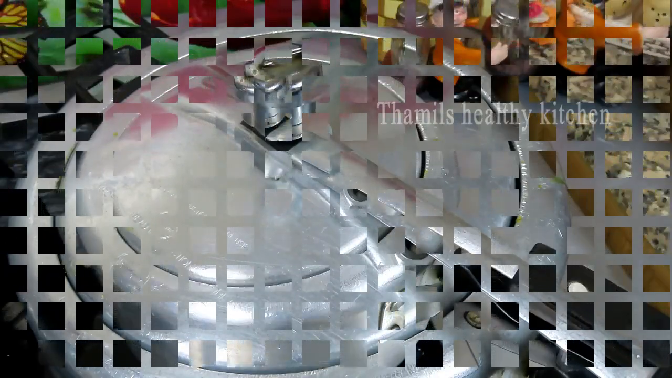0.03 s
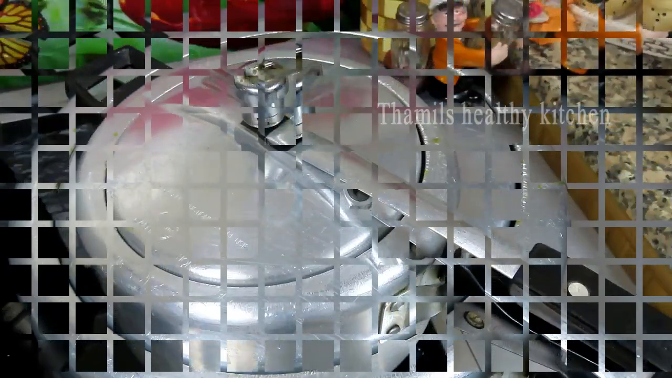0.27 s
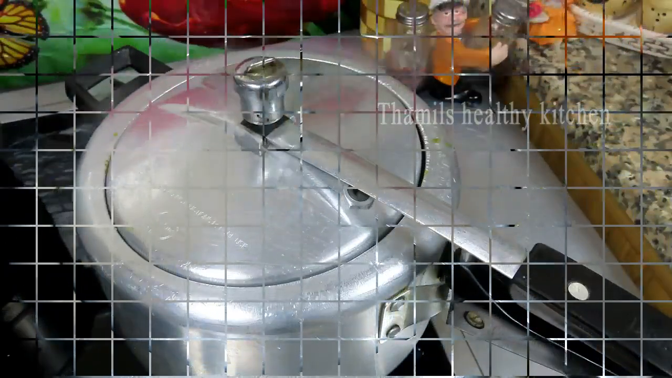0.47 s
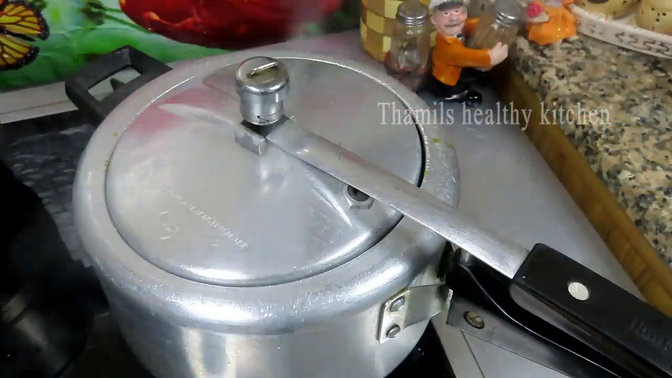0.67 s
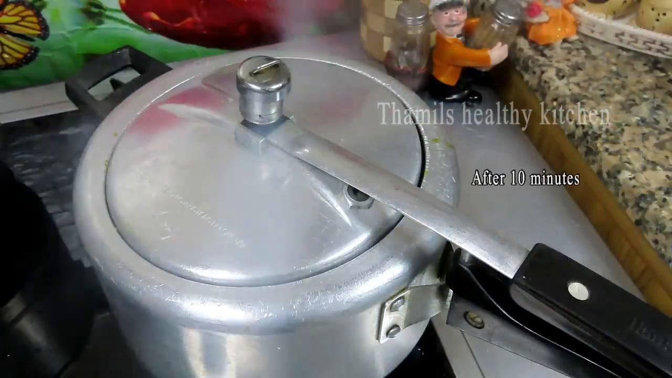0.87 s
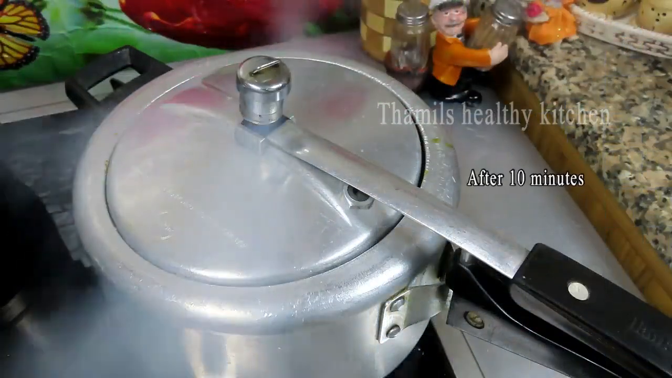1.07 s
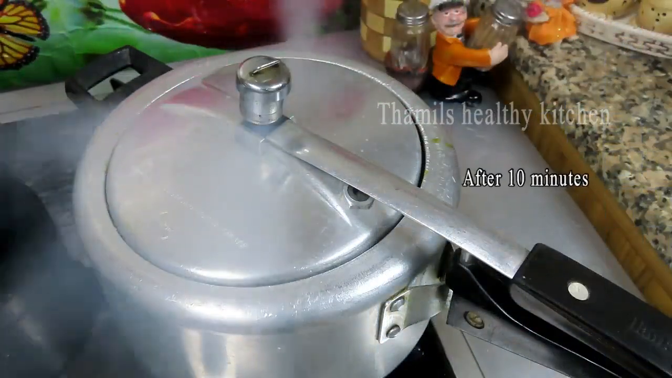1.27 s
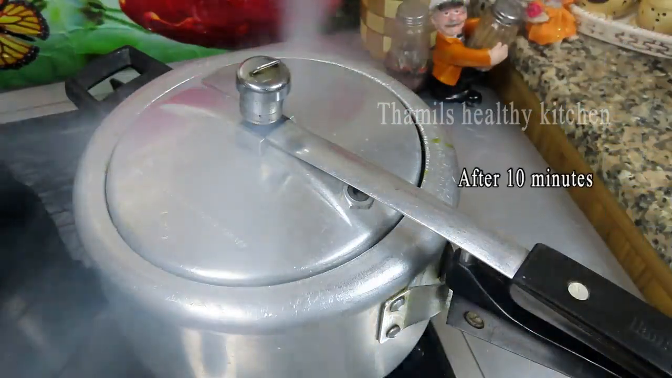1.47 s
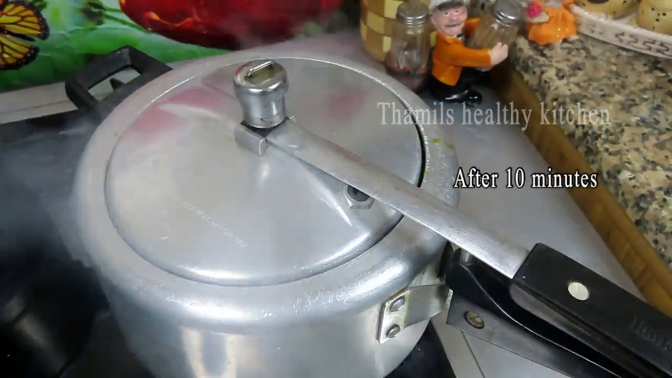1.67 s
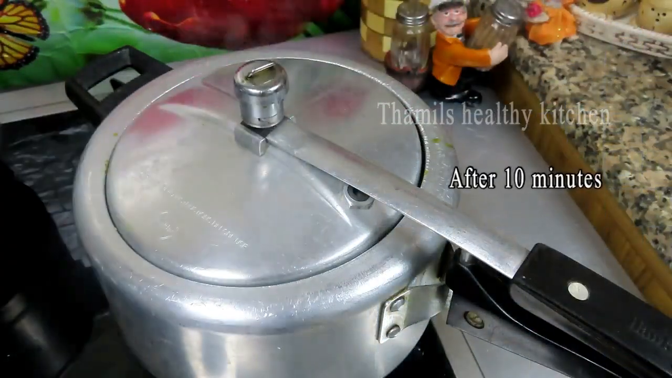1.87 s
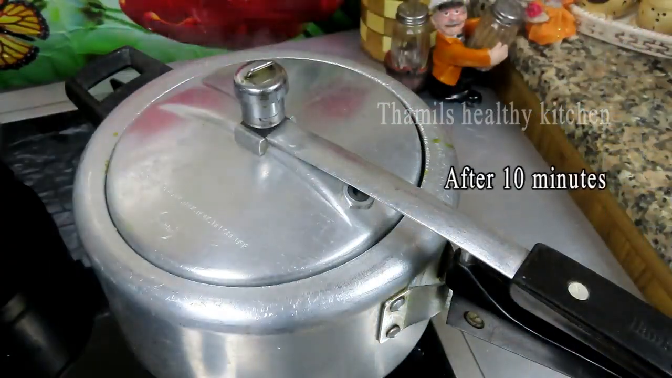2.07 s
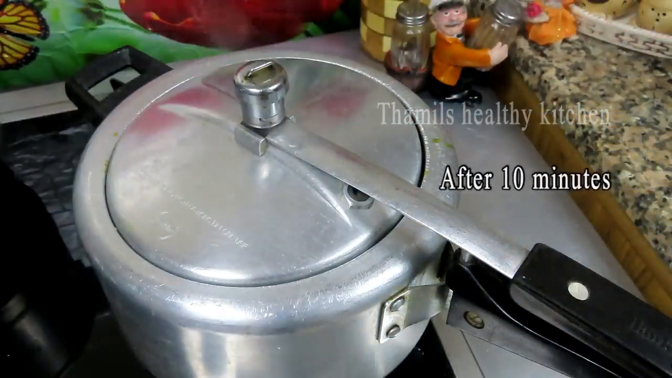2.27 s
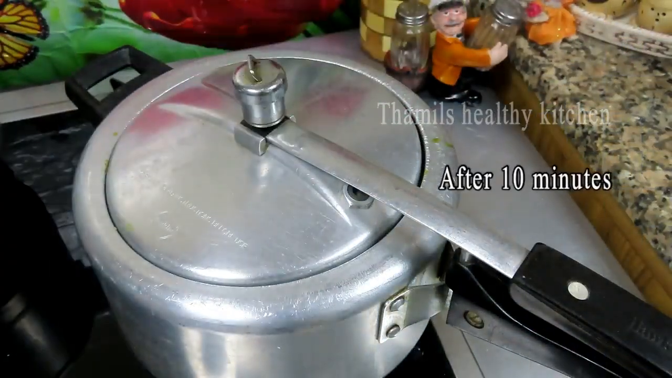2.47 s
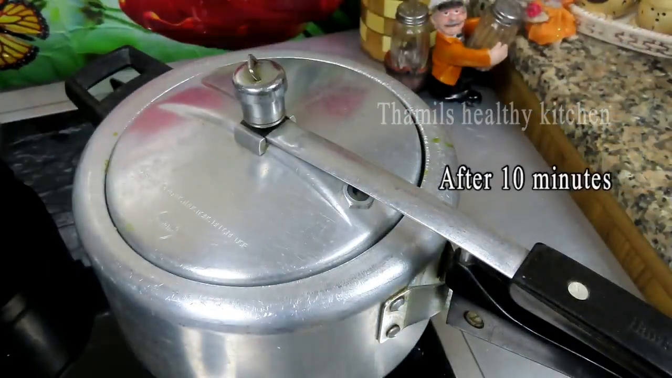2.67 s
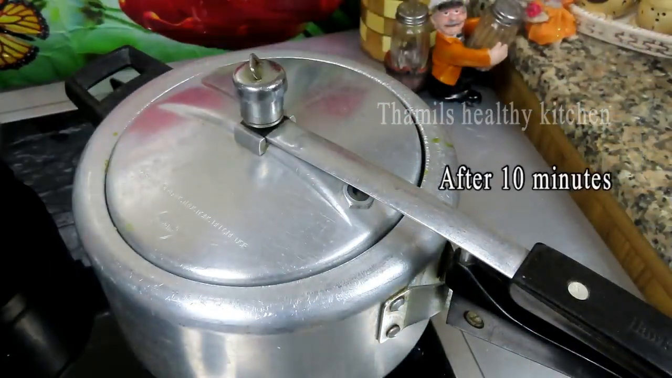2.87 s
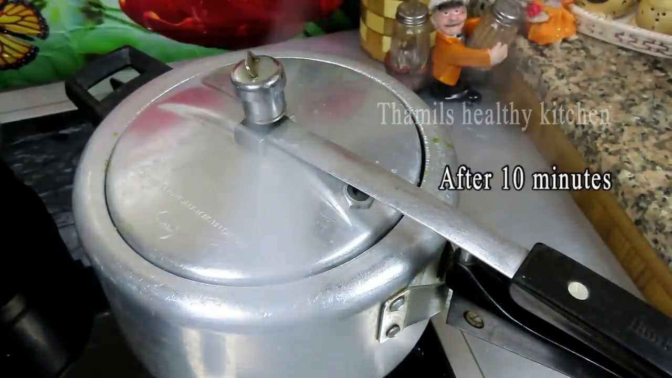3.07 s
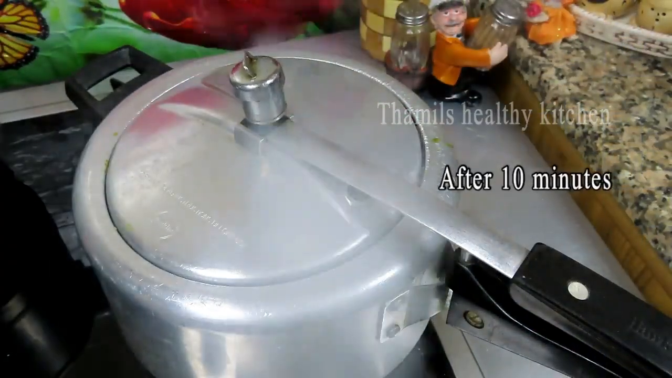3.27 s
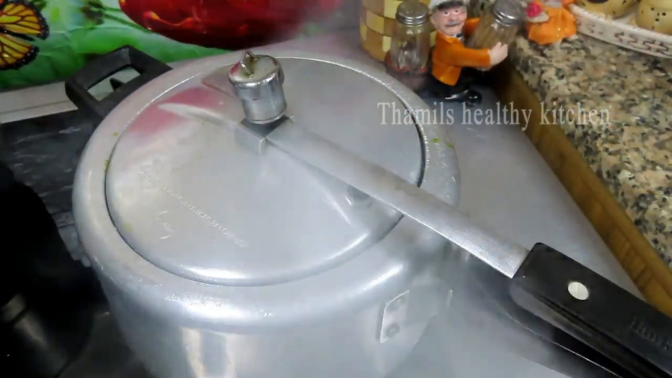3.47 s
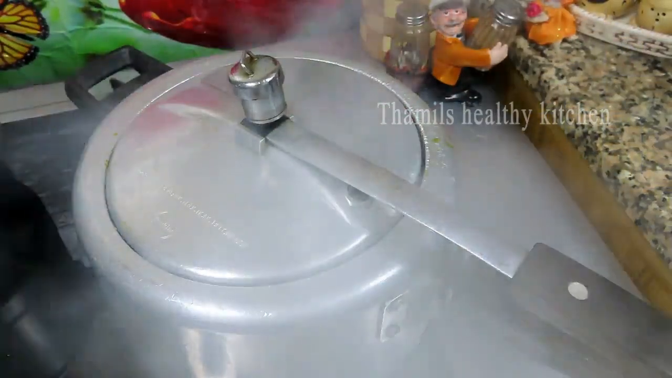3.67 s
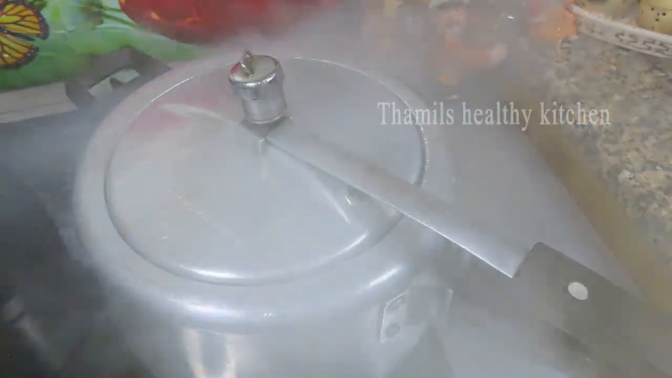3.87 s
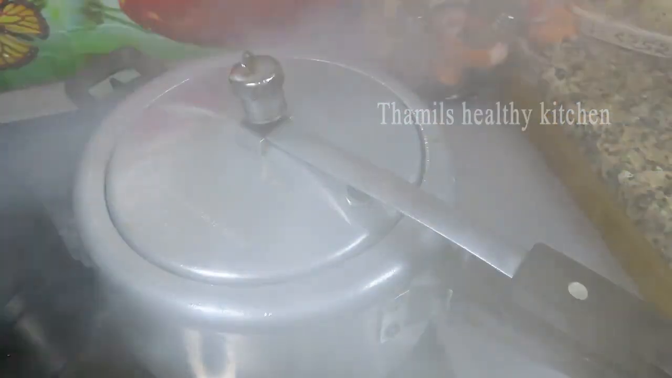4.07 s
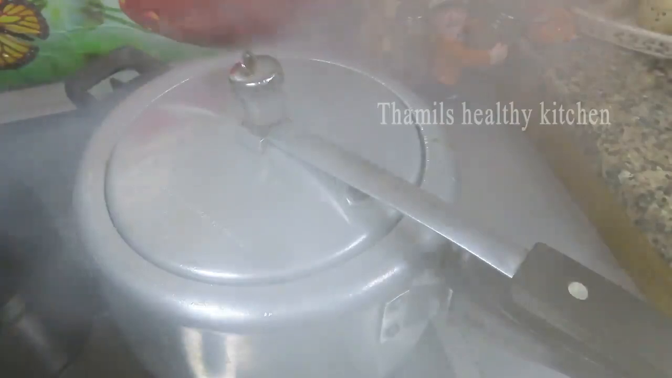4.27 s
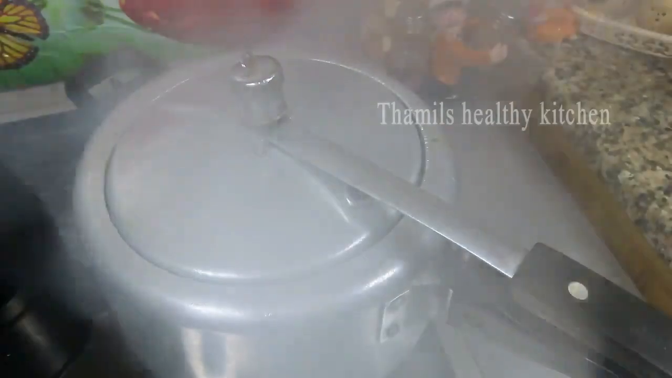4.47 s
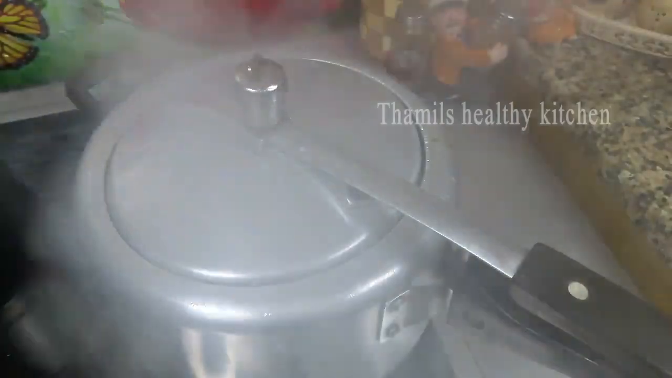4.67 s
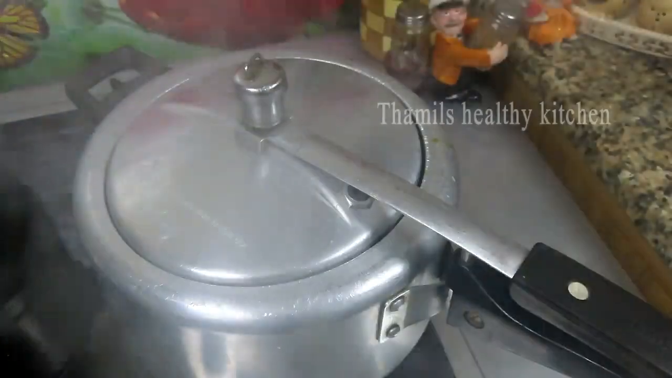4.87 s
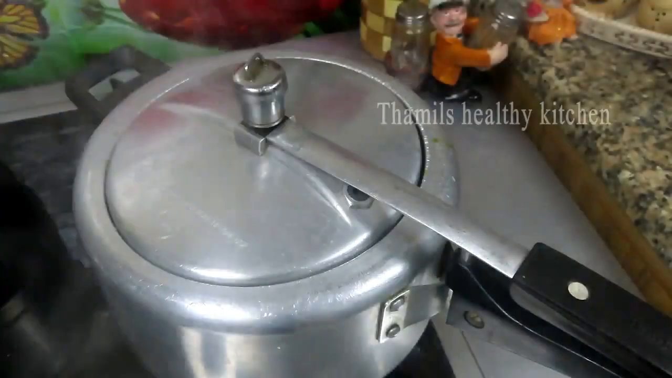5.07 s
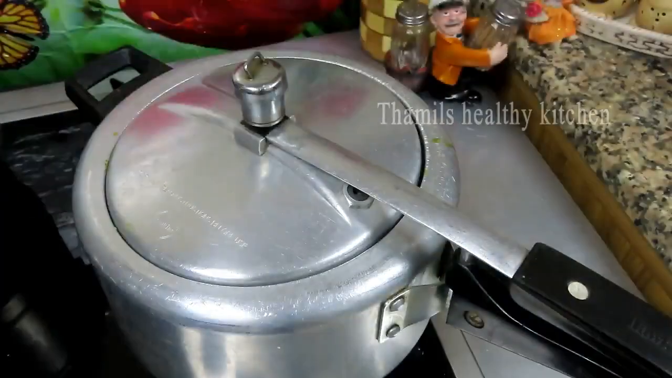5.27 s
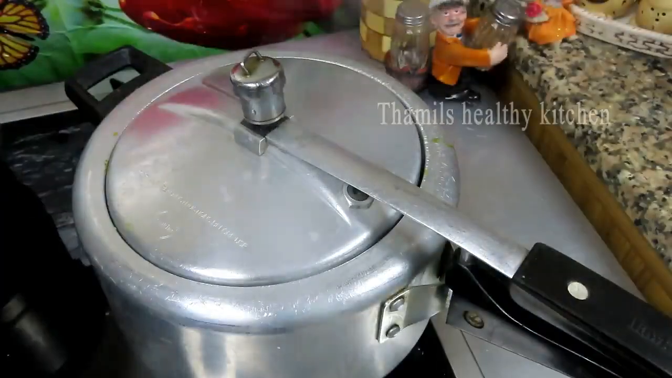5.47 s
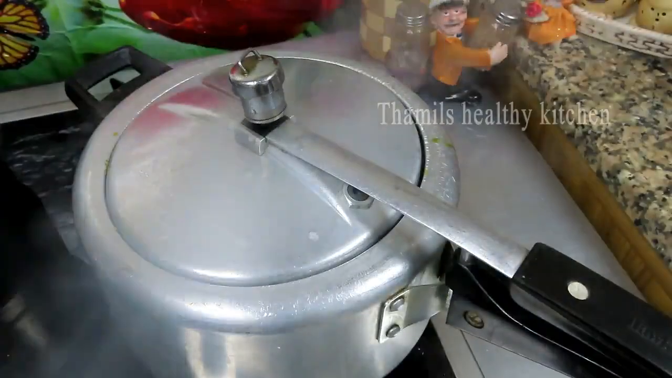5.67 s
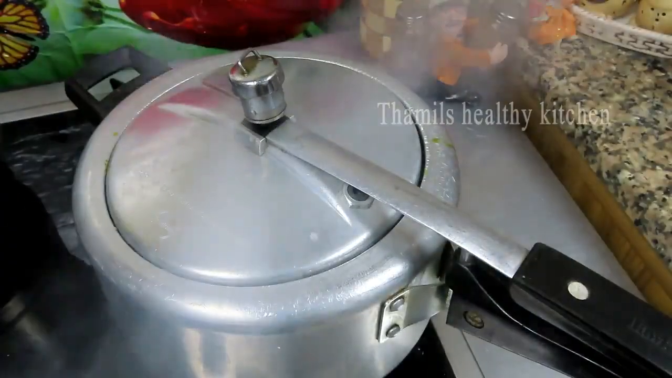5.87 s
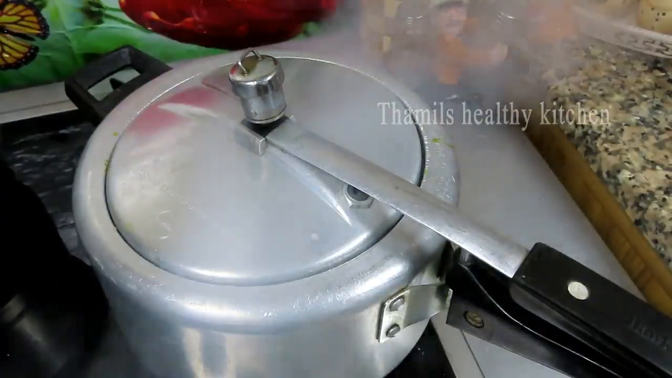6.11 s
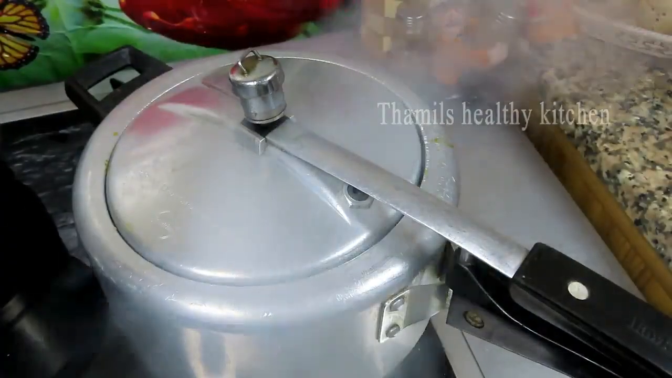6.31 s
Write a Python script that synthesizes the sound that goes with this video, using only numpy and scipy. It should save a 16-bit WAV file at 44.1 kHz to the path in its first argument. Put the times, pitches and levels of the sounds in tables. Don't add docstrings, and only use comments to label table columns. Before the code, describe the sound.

Very close stereo in a hard-walled kitchen: faint steam spits, then a pressure cooker valve pops open into a loud, roaring hiss lasting over a second. It shuts abruptly. Hollow knocks come from another room, then a longer blast buffets the microphone. After another lull, a short third burst coincides with a metal clatter and continues as a steady hiss.

```python
import sys
import numpy as np
from scipy import signal
from scipy.fft import rfft, irfft, next_fast_len
from scipy.io import wavfile
from scipy.ndimage import uniform_filter1d, map_coordinates

SR = 44100
rng = np.random.default_rng(int(sys.argv[2]) if len(sys.argv) > 2 else 0)


def invert_db(level):
    return 10 ** (np.asarray(level, dtype=float) / 20)


def materialize(psi):
    bounded = np.clip(np.atleast_2d(psi).T, -1, 1)
    quanta = np.round(bounded * 32767).astype(np.int16)
    wavfile.write(sys.argv[1], SR, quanta)


N = 279726

# start in seconds, end in seconds.
VIEWS = [
    (0, 2.41),
    (2.428, 5.162),
    (5.176, 6.34),
]
LATER_STARTS_S = [start_s for start_s, _ in VIEWS[1:]]

# lift in seconds, fully open in seconds, shut in seconds,
# hiss level in dB, sag in dB per second.
BLASTS = [
    (.425, .495, 1.665, -18, 3),
    (2.94, 3.03, 4.647, -19.5, 2.5),
    (5.325, 5.43, 5.53, -17.5, 12),
]
# lift in seconds, fully open in seconds, shut in seconds,
# hiss level in dB, sag in dB per second.
LEAKS = [(-.1, 0, 0.49, -43.5, 3), (.28, .425, .45, -33, .6), (.72, .76, .9, -23.5, 20),
         (2.4, 2.43, 2.98, -41, .6), (2.5, 2.59, 2.57, -30.5, .6), (2.785, 2.865, 3.0, -30.5, -10),
         (3.1, 3.3, 3.6, -26, -5), (5.1, 5.17, 5.36, -41.5, -1), (5.275, 5.285, 5.35, -44, .6),
         (5.42, 5.6, 6.4, -19, 1.8), (5.54, 5.63, 5.7, -19.5, 15)]
# start in seconds, peak in dB, T60 in
# seconds.
SPITS = [
    (0.2734, -18, 0.055),
    (0.3274, -18, 0.067),
    (0.3686, -15, 0.045),
    (0.4145, -15, 0.04),
    (0.433, -2.5, 0.076),
    (5.316, -7, .045),
]
# centre in Hz, width in Hz, level in dB.
VALVE_GAP = [(5490, 114, 3), (5930, 45, -0.5), (6346, 48, 0.5), (6824, 64, 1.5), (7340, 130, 2.5)]
# frequency in Hz, density in dB per Hz.
HISS_SPECTRUM = [(3500, -24.5), (5400, -8.5), (5800, -0.5), (7000, 1), (7700, -5.5), (8600, -61)]
# frequency in Hz, density in dB per Hz.
FIZZ_SPECTRUM = [(6800, -50), (7800, 3), (11000, 1.5), (15000, 0), (15800, -2.5), (17000, -4)]
# frequency in Hz, density in dB per Hz.
ROAR_SPECTRUM = [(530, -8), (900, -13.5), (1290, -6), (1470, -6), (1690, -1), (1920, -5), (2150, 0),
                 (2320, -1.5), (5260, -1), (5500, -12.5), (7150, -33), (12100, -120)]
# frequency in Hz, density in dB per Hz.
BUFFET_SPECTRUM = [(140, -31), (270, -2.5), (440, -5), (670, -4), (1200, -9), (1600, -14), (2600, -70)]
# frequency in Hz, left-right likeness (1 = same).
JET_LIKENESS = [(60, 1), (130, 1), (290, 0.42), (640, 0), (1400, 0.77), (3100, 0.72), (6800, 0.76),
                (7700, 0.8), (8000, 0.44), (15000, 0.28)]

# frequency in Hz, density in dB per Hz.
BURNER_SPECTRUM = [(15, -40), (35, 0.5), (60, -0.5), (100, -2.5), (190, -1.5), (260, -6.5), (340, -28),
                   (600, -70)]
# loudest time in seconds, level in dB, swell in dB per second,
# fade in dB per second, least level in dB.
RUMBLE_SWELLS = [
    (1.05, -43, 1.2, 24, -52),
    (3.85, -40.5, 3.5, 20, -57.5),
    (5.45, -39.5, 5, 9, -51.5),
]
# frequency in Hz, left-right likeness.
RUMBLE_LIKENESS = [(40, 1.0), (90, 1.0), (140, 0.68), (260, 0.33)]
# frequency in Hz, density in dB per Hz.
FLOOR_SPECTRUM = [(180, -31), (300, 2), (511, -2), (634, -2), (1900, -1.5), (4300, -10.5), (7440, -5.5),
                  (11300, -15), (13100, -5.5), (16000, -11.5)]
# frequency in Hz, left-right likeness.
FLOOR_LIKENESS = [(100, 1.0), (600, 0.93), (8000, 0.53)]

# start in seconds, peak in dB, left minus right in dB,
# width in ms, sign (+1 push, -1 pull).
EDDY_POPS = [(0.436, -23, .5, .7, 1), (.857, -28, 2, 0.97, 1), (.98, -25, -2.5, 1.6, 1),
             (1.153, -21.5, -5, 1.2, 1), (3.478, -19, 4, 1.3, -1), (3.639, -23, -8, 1.3, 1),
             (3.81, -21, 0, 0.6, 1), (3.885, -13.5, -17, 1.6, -1), (3.895, -18, 17, .9, -1),
             (4.013, -23.5, 6, 1.9, 1), (4.655, -32, 2, 1.8, 1), (5.689, -19, 5, 1.7, 1)]

# start in seconds, peak
# in dB, bright part in dB, T60 in seconds.
KNOCKS = [(0.465, -19, -2.5, 0.42), (1.714, -37.5, 9, 0.19), (1.748, -41.5, 9, 0.38),
          (2.002, -33.5, -1, 0.39), (2.058, -38.5, -1.5, 0.33), (2.427, -20, -9.5, 0.56),
          (2.449, -17.5, -6.5, 0.35), (2.509, -13, -16, 0.23), (2.525, -13.5, -11.5, 0.23),
          (2.553, -13.5, -17, 0.22), (2.64, -28, -12, 0.3), (2.665, -28, -15, 0.2), (2.706, -37, -6, 0.25),
          (2.783, -10.5, -6.5, 0.2), (2.797, -18, -3, 0.33), (2.834, -8, -12.5, 0.31),
          (3.022, -19.5, -1.5, 0.42), (3.372, -20.5, -1, 0.37), (4.042, -27, -11, 0.19),
          (4.367, -25, -3.5, 0.14), (4.635, -26.5, -3, 0.17), (4.681, -27, -4, 0.4),
          (4.737, -35.5, 2, 0.35), (4.887, -37.5, -4.5, 0.32), (4.951, -25.5, -7, 0.45),
          (4.996, -22.5, -5, 0.3), (5.28, -29.5, -5, 0.26), (5.317, -12.5, -3.5, 0.15),
          (5.355, -14.5, -8, 0.17)]
# start in seconds, peak in dB, T60 in seconds.
THUDS = [
    (2.004, -35, .25),
    (2.068, -36, 0.29),
    (2.43, -42, .4),
    (2.553, -24, 0.2),
    (3.372, -32, 0.37),
    (5.28, -31.5, .24),
]
# centre in Hz, width in Hz, level in dB.
DOORWAY = [(354, 46, 1), (462, 56, 2.5), (537, 93, -0.5), (600, 45, 2), (683, 27, 3), (856, 110, -9.5)]
# centre in Hz, width in Hz, level in dB.
SLAP = [(1033, 280, -1), (2270, 1360, -17)]
# centre in Hz, width in Hz, level in dB.
PANE = [(1470, 240, 1.5), (1880, 490, -2.5), (4370, 2200, -14)]
PANE_SHARE = [0.68, 0.087, 0.31]
# frequency in Hz, density in dB per Hz.
BOOM_SPECTRUM = [(120, -32), (190, 3), (250, 14), (310, -13), (450, -39)]
# frequency in Hz, left minus right in dB.
KNOCK_LEAN = [(200, 0.5), (700, -5), (1300, 0.5), (2400, 4.5)]

# start in seconds, peak in dB.
CLATTER = [
    (5.3158, 0),
    (5.3212, -4),
    (5.5025, -1),
]
# frequency in Hz, level in dB, T60 in seconds.
UTENSIL_MODES = [(390, -15, 0.11), (512, -1, 0.044), (791, -4.5, 0.077), (1210, -17, 0.1),
                 (1372, -5, 0.079), (2280, -6.5, 0.044), (3247, 0, 0.15), (3380, -3, 0.066),
                 (5071, -30, 0.082), (7000, -12, .06)]
# frequency in Hz, level in dB, T60 in seconds.
RIM_MODES = [(1107, 3, 0.055), (1580, -10, .08), (2920, -1.2, .15), (3250, -2, 0.068), (3950, -6, .06)]


def unit(x):
    return x / np.sqrt(np.mean(x ** 2) + 1e-20)


def along(points, hz):
    f, v = np.transpose(points)
    return np.interp(np.log(hz + 1), np.log(f + 1), v)


def spectrum(points):
    return lambda hz: invert_db(along(points, hz))


def wobble(knots_per_s):
    knots = rng.standard_normal(int(N * knots_per_s / SR) + 4)
    return map_coordinates(knots, [np.arange(N) * knots_per_s / SR])


def filtered(x, response):
    size = next_fast_len(N + 8192)
    return irfft(rfft(x, size) * response(np.fft.rfftfreq(size, 1 / SR)), size)[..., :N]


def highpass(corner_hz):
    return lambda hz: (1j * hz / (corner_hz + 1j * hz)) ** 2


def resonances(peaks, hz):
    total = 0
    for k, (centre, width, db) in enumerate(peaks):
        bell = 1j * hz * width / (centre * centre - hz * hz + 1j * hz * width)
        total = total + (-1) ** k * invert_db(db) * bell
    return total


def rush(gain, likeness, patchy_db):
    z = signal.stft(rng.standard_normal((2, N + 512)), nperseg=512)[2]
    field = uniform_filter1d(rng.standard_normal(z.shape[1:]), 5, 0)
    field = uniform_filter1d(field, 8, 1)
    pair = signal.istft(z * invert_db(patchy_db * unit(field)), nperseg=512)[1][:, :N]

    def mid_side_gain(hz):
        angle = np.arccos(np.clip(along(likeness, hz), -1, 1)) / 2
        return gain(hz) * [np.cos(angle), np.sin(angle)]

    mid, side = filtered(pair, mid_side_gain)
    return unit(np.array([mid + side, mid - side]))


def bursts(times_s, peaks_db, t60s, rise_s):
    power = np.zeros(N + SR)
    t = np.arange(SR // 2) / SR
    for start_s, db, t60 in zip(times_s, peaks_db, t60s):
        burst = invert_db(db - 60 * t / t60) * (1 - np.exp(-t / rise_s))
        power[round(start_s * SR):][:len(t)] += burst ** 2
    return np.sqrt(power[:N])


def view_of(s):
    return np.searchsorted(LATER_STARTS_S, s, side="right")


def valve_db(surge_db, release_db_per_s, faint_db):
    t = np.arange(0, N, 16) / SR
    extra_db = np.resize(faint_db, len(VIEWS))
    power = 1e-9
    for rows, surge in ((BLASTS, surge_db), (LEAKS, 0)):
        for lift, full, shut, db, sag in rows:
            view = view_of(shut - 0.05)
            held = np.clip(t, full, shut) - full
            level = db + extra_db[view] * (db < -35)
            level = level + surge * np.exp(-held / 0.16)
            level = level - sag * held - release_db_per_s * np.maximum(t - shut, 0)
            rise = np.clip((t - lift) / (full - lift), 0, 1) ** 1.4
            power = power + (rise * invert_db(level)) ** 2 * (view_of(t) == view)
    return np.interp(np.arange(N) / SR, t, 10 * np.log10(power))


def steam():
    view = view_of(np.arange(N) / SR)
    sputter_db = 0.5 * wobble(14) + 0.52 * wobble(60)
    start_s, peak_db, t60 = np.transpose(SPITS)
    spits = bursts(start_s, peak_db - 8, t60, rise_s=0.0022)

    def flow(level_db, spit_db):
        return np.hypot(invert_db(level_db + sputter_db), invert_db(spit_db) * spits)

    def gap_gain(hz):
        return spectrum(HISS_SPECTRUM)(hz) * np.hypot(1, 1.55 * np.abs(resonances(VALVE_GAP, hz)))

    hiss_db = valve_db(surge_db=1.6, release_db_per_s=182, faint_db=0)
    fizz_db = valve_db(surge_db=1.9, release_db_per_s=180, faint_db=0.26) + np.take([1.56, 3.5, 2.5], view)
    roar_db = valve_db(surge_db=5.5, release_db_per_s=135, faint_db=0.3) + np.take([-2.5, -2.1, -2.5], view)
    jet = flow(hiss_db, spit_db=0) * rush(gap_gain, JET_LIKENESS, patchy_db=1.0)
    jet = jet + flow(fizz_db, spit_db=-9.5) * rush(spectrum(FIZZ_SPECTRUM), JET_LIKENESS, patchy_db=1.55)
    jet = jet + flow(roar_db, spit_db=-6.5) * rush(spectrum(ROAR_SPECTRUM), JET_LIKENESS, patchy_db=0.9)
    jet = filtered(jet, lambda hz: hz ** 4 / (hz ** 4 + 500 ** 4))

    lumps = invert_db(2.2 * np.array([wobble(25), wobble(25)]))
    buffet = unit(lumps * rush(spectrum(BUFFET_SPECTRUM), JET_LIKENESS, patchy_db=3.2))
    push_db = valve_db(surge_db=17, release_db_per_s=170, faint_db=[19.3, 6, 1.3])
    buffet_db = 0.45 * push_db + np.take([-31.5, -28, -25.5], view)
    return jet + invert_db(buffet_db) * buffet


def rumble():
    t = np.arange(N) / SR
    top_s, db, swell, fade, least_db = np.transpose(RUMBLE_SWELLS)[:, view_of(t)]
    level_db = db - swell * np.maximum(top_s - t, 0) - fade * np.maximum(t - top_s, 0)
    level_db = np.maximum(level_db, least_db) + 1.6 * wobble(17)
    return invert_db(level_db) * rush(spectrum(BURNER_SPECTRUM), RUMBLE_LIKENESS, patchy_db=0.5)


def kitchen_floor():
    return invert_db(-51.5) * rush(spectrum(FLOOR_SPECTRUM), FLOOR_LIKENESS, patchy_db=0.8)


def eddy_pops():
    out = np.zeros((2, N))
    t = np.arange(SR // 20) / SR
    for start_s, db, pan_db, width_ms, sign in EDDY_POPS:
        u = t / (width_ms / 1000)
        push = sign * u * (2 - u) * np.exp(1 - u)
        sides = invert_db([[db + pan_db / 2], [db - pan_db / 2]])
        out[:, round(start_s * SR):][:, :len(t)] += sides * push
    return filtered(out, highpass(60))


def knocks():
    s, db, bright_db, t60 = np.transpose(KNOCKS)
    air = rush(np.ones_like, [(100, 1.0)], patchy_db=0.9)
    tail = bursts(s, db - 7.0, t60, rise_s=0.00049)
    arrival = bursts(s, db - 6.0, np.full(len(s), 0.013), rise_s=0.00079)
    front = np.bincount((s * SR).astype(int), invert_db(db + 16), N)

    def hollow(hz):
        return resonances(DOORWAY, hz) * highpass(240)(hz)

    dull = filtered(air * np.hypot(tail, arrival) + front, hollow) / np.std(filtered(air, hollow))

    view = np.searchsorted(np.subtract(LATER_STARTS_S, 0.01), s)
    share = np.clip(PANE_SHARE, 0.02, 0.98)[view]
    bright = 0
    for body, part in ((SLAP, 1 - share), (PANE, share)):
        noise = rush(lambda hz: resonances(body, hz), [(100, 0.93)], patchy_db=0.8)
        part_db = db + bright_db - 3.5 + 10 * np.log10(part)
        bright = bright + noise * bursts(s, part_db, 1.13 * t60, rise_s=0.00035)

    thud_s, thud_db, thud_t60 = np.transpose(THUDS)
    every_blow = bursts(s, db - 20.5, 0.67 * t60, rise_s=0.0044)
    heavy_blows = bursts(thud_s, thud_db - 1.5, 0.73 * thud_t60, rise_s=0.0033)
    boom = rush(spectrum(BOOM_SPECTRUM), [(100, 1.0)], patchy_db=0.5) * np.hypot(every_blow, heavy_blows)
    return filtered(dull + bright + boom, lambda hz: invert_db(along(KNOCK_LEAN, hz) * np.array([[0.5], [-0.5]])))


def clatter():
    out = np.zeros((2, N))
    t = np.arange(SR // 4) / SR
    for (start_s, db), modes in zip(CLATTER, (UTENSIL_MODES, UTENSIL_MODES, RIM_MODES)):
        ring = sum(invert_db(level - 60 * t / t60) * np.sin(2 * np.pi * hz * t) for hz, level, t60 in modes)
        noise = rng.standard_normal(len(t)) + 0.79 * rng.standard_normal((2, len(t)))
        crack = 1.25 * invert_db(-60 * t / 0.019) * noise
        out[:, round(start_s * SR):][:, :len(t)] += invert_db(db - 11.5) * (ring + crack)
    return out


def scene():
    return steam() + rumble() + kitchen_floor() + eddy_pops() + knocks() + clatter()


def low_pass(x):
    return signal.sosfilt(signal.butter(12, 16480, fs=SR, output="sos"), x)


def record(dry):
    mix = np.clip(filtered(dry, highpass(38)), -1, 1)
    return low_pass(mix)


dry = scene()
out = record(dry)
materialize(out)
```